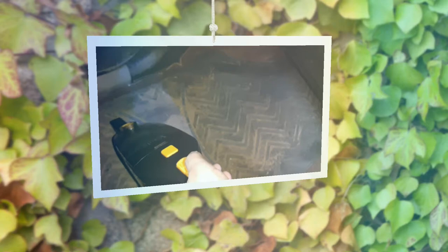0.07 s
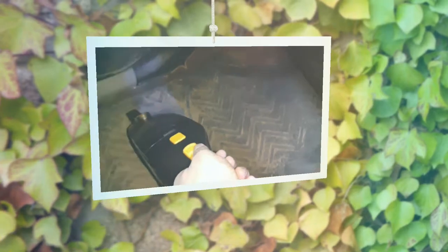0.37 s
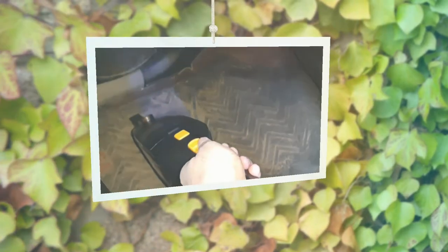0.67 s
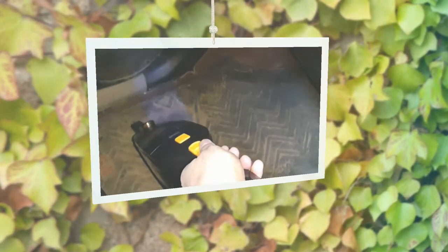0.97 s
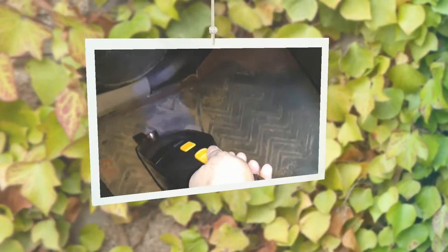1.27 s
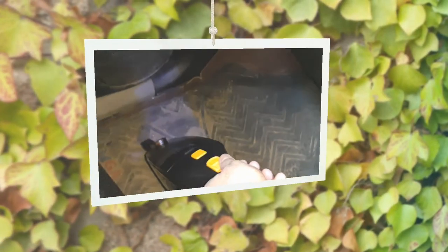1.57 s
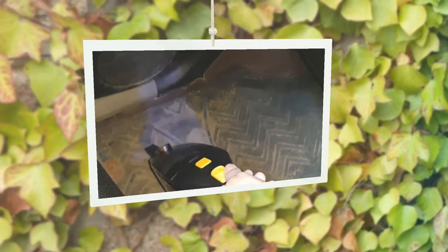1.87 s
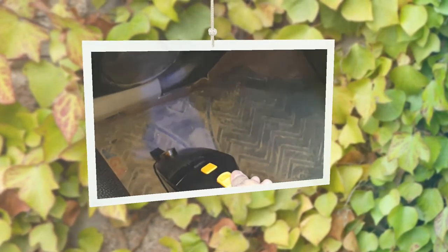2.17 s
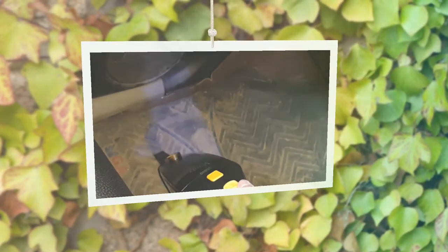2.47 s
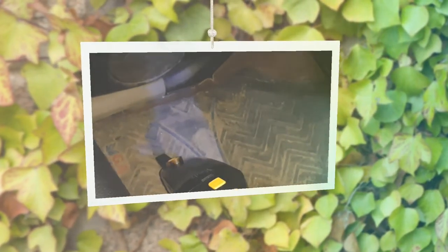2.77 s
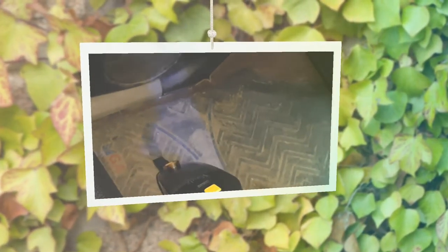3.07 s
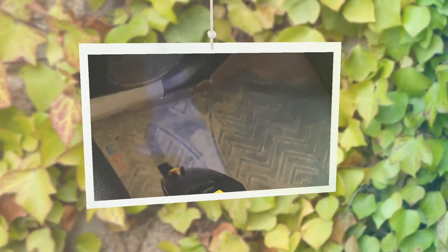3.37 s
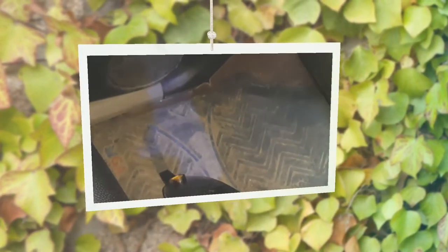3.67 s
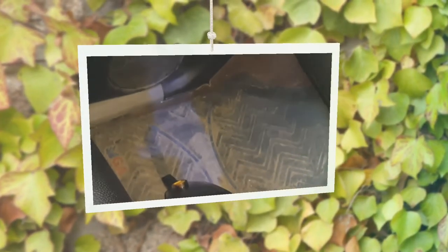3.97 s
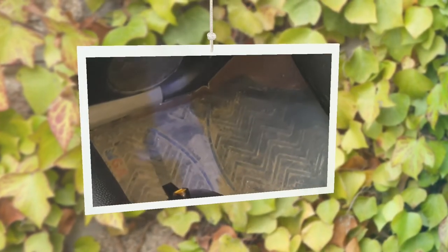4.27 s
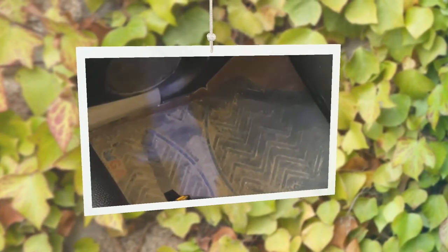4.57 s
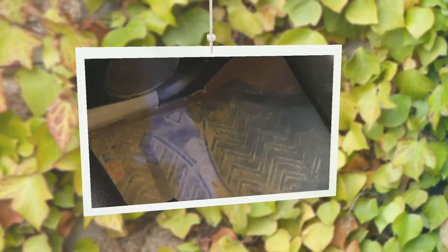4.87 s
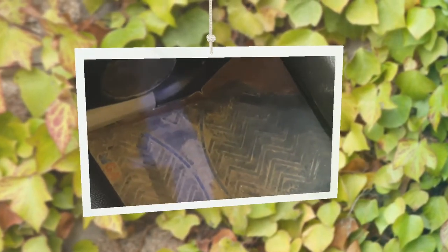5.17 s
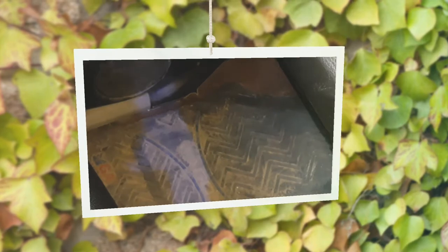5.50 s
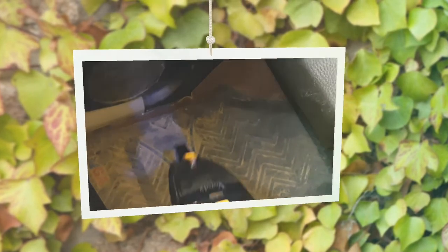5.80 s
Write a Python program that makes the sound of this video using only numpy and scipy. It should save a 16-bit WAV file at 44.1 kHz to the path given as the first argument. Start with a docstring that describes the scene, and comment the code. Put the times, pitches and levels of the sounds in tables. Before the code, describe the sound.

Heard close up in stereo, in the tight space of a car footwell, a handheld vacuum quickly comes up to speed. A wavering high whine and a lower hum sit within hollow, hissing suction, which swells briefly as the nozzle snags on the mat. Finally a switch clicks and the motor begins winding down, its tones sliding lower.

```python
"""A small handheld vacuum cleaner runs up in a car footwell, close to a stereo microphone.
Its shaft hums, the seven-blade fan whines, and air rushes through the nozzle and the plastic housing.
The hand draws it over the mat towards the microphone, the nozzle catching and gulping air on the way.
At about 5.5 s the switch snaps off and it starts to wind down: the air eases, and the falling tones
sweep through the resonances of the housing."""
import sys
import numpy as np
from scipy import signal
from scipy.fft import rfft, irfft, next_fast_len
from scipy.io import wavfile

SR = 44100
rng = np.random.default_rng(int(sys.argv[2]) if len(sys.argv) > 2 else 0)


def dump(signal):
    """Clip the signal to [-1, 1] and save it as 16-bit WAV at the path in sys.argv[1]."""
    limited = np.clip(np.atleast_2d(signal).T, -1, 1)
    pcm = np.round(limited * 32767).astype(np.int16)
    wavfile.write(sys.argv[1], SR, pcm)


N = 266275
TIME = np.arange(N) / SR
SIZE = next_fast_len(N, real=True)
HZ = np.arange(SIZE // 2 + 1) * SR / SIZE
START_S, OFF_S = 0.118, 5.47
RUN_HZ, BLADES = 418, 7  # nominal shaft speed; fan blades

# The hand draws the cleaner back. Each row: time in seconds, place from 0 (far) to 1 (at the microphone).
DRAWN = [(0.5, 0), (1.6, 0.21), (2.7, 0.79), (4.3, 0.91), (4.7, 1)]


def undb(db):
    """Decibels to gain."""
    return 10 ** (np.asarray(db) / 20)


def curve(points):
    """Join (seconds, value) points into a line through time."""
    return np.interp(TIME, *np.transpose(points))


def spectrum(points):
    """Join (Hz, value) points on a log-frequency axis."""
    hz, value = np.transpose(points)
    return np.interp(np.log(HZ + 1), np.log(hz), value)


def walk(rate):
    """Smooth random motion of unit spread, changing about rate times a second."""
    size, per_s = 4096, 500
    hz = np.arange(size // 2 + 1) * per_s / size
    motion = irfft(rfft(rng.standard_normal(size)) * np.exp(-(hz / rate) ** 2))
    return np.interp(TIME, np.arange(size) / per_s, motion / motion.std())


def swell(peak_s, half_width_s):
    """A smooth rise and fall, 1 at its top."""
    return np.exp(-((TIME - peak_s) / half_width_s) ** 2)


def sides(pan_db):
    """Left and right gains of constant total power."""
    gain = undb(np.array([pan_db, -pan_db]) / 2)
    return gain / np.sqrt(np.mean(gain ** 2, axis=0))


def shaft_speed(short_hz=64.2, spin_up_s=0.385):
    """Turns per second: the motor runs up, works, then coasts."""
    # Working speed rises as the nozzle is choked. Each row: time in seconds, speed in Hz.
    working = [(2.05, 416.6), (2.26, 420.3), (2.91, 423.6), (3.79, 426.5), (4.4, 424.4), (4.85, 419.8),
               (5.36, 417.5)]
    return (curve(working) - short_hz * np.exp((START_S - TIME) / spin_up_s)) * coast()


def motor(speed):
    """Unbalance hums at the shaft rate, the blades whistle at seven times it, among other shaft orders."""
    # Each entry: shaft order, level in dB; first the weak orders under power, then the coasting rotor.
    weak_db = {2: -52, 6: -55, 8: -54, 9: -55, 11: -50, 15: -56, 19: -52, 21: -46, 22: -51, 26: -54, 28:
               -49.5}
    unpowered_db = {1: -45.5, 2: -46.5, 3: -49, 4: -49.5, 5: -51.5, 6: -51, 7: -52, 8: -55, 14: -55}
    # Housing resonances. Each row: order that drives it, centre in Hz, width in Hz, gain in dB.
    housing = [(1, 401, 48.5, 10.5), (1, 303, 24, 5), (2, 765, 70, 6), (4, 1560, 130, 12),
               (5, 1855, 36, 20), (5, 1730, 65, 15), (6, 1850, 150, 9), (7, 2528, 56, 23.5),
               (7, 2352, 38, 23.5), (14, 4930, 130, 10), (14, 4700, 110, 12), (14, 4260, 170, 11),
               (28, 11100, 550, 5)]
    dip = swell(5.42, 0.009)  # pitch and level dip just before switch-off
    wobble = 0.00045 * walk(38) + 0.00062 * walk(4.7)
    turns = np.cumsum(speed * (1 + wobble - 0.04 * dip)) / SR
    coasting = np.clip((TIME - OFF_S) / 0.13, 0, 1)
    strong, pans = strong_orders(speed)
    out = 0
    for order, run_db in {**weak_db, **strong}.items():
        modes = [row[1:] for row in housing if round(row[0]) == order]
        ring_db = housing_gain(modes, order * speed)
        if order in strong:
            scatter = 0.022 * order
        else:
            run_db, scatter = run_db + ring_db, 0.6
        # a falling tone flickers as it crosses standing waves, the faster the higher its order
        ripple_db = 0.26 * order * walk(2.66 * order)
        coast_db = unpowered_db.get(order, weak_db.get(order, 0) - 22) + ring_db + ripple_db
        level_db = run_db + (coast_db - run_db) * coasting
        pan_db = pans.get(order, np.zeros(N)) * (1 - coasting)
        out = out + shaft_tone(order, turns, level_db, pan_db, scatter)
    return out * undb(-5 * dip)


def strong_orders(speed, hum_db_per_octave=35):
    """Level and lean in dB of the strong orders under power, shifting as the cleaner moves."""
    # The loudest whine, the thinner tone just above it, the blade whistle and its octave.
    # Each row: time in seconds, level in dB.
    whine = [(0.25, -36.5), (0.39, -33), (0.6, -36.5), (0.85, -36.5), (1.38, -38), (1.73, -35.5),
             (1.95, -37.5), (2.35, -31.5), (2.97, -29), (3.66, -28.5), (4.2, -34), (4.48, -36), (4.75, -31),
             (5.14, -31), (5.27, -32.5), (5.4, -31)]
    thin_tone = [(0.22, -42), (0.34, -35.5), (0.42, -38), (0.54, -55), (0.8, -46), (1.22, -37.5),
                 (1.45, -47), (3.0, -48), (3.85, -65), (4.4, -52), (4.95, -45), (5.4, -47)]
    whistle = [(0.2, -34), (0.3, -45), (0.38, -39), (0.51, -42), (0.63, -34), (1.2, -41), (1.6, -32),
               (1.9, -38), (2.3, -35.5), (2.9, -44), (3.25, -41), (3.7, -42.5), (4.0, -37.5), (4.8, -41),
               (5.3, -38.5)]
    whistle_octave = [(0.33, -43), (0.9, -49), (1.1, -42.5), (1.3, -42.5), (1.48, -51), (1.7, -45),
                      (2.15, -44), (2.5, -41), (2.78, -41), (3.08, -56), (3.4, -46), (3.7, -50), (3.9, -56),
                      (4.25, -47), (4.5, -48), (4.68, -40), (4.95, -47), (5.35, -46)]
    # Standing waves pull the whine to one side. Each row: time in seconds, left minus right in dB.
    whine_lean = [(0.4, 0.0), (0.69, -1.0), (0.75, -13), (1.07, 3.5), (2.15, -7.5), (2.31, -22), (2.82, -5),
                  (4.49, 2), (5.4, -1)]
    # The hum. Each row: order, level far and near in dB, left minus right far and near in dB.
    hum = [(1, -31, -33.5, 5.5, -1), (3, -49, -34.5, 3.5, -6)]
    drawn, lean = curve(DRAWN), curve(whine_lean)
    levels = {4: curve(whine), BLADES: curve(whistle),
              5: curve(thin_tone), 2 * BLADES: curve(whistle_octave)}
    pans = {4: lean, BLADES: 0.98 * lean}
    for order, far_db, near_db, far_pan, near_pan in hum:
        levels[round(order)] = far_db + (near_db - far_db) * drawn
        pans[round(order)] = far_pan + (near_pan - far_pan) * drawn
    levels[1] += hum_db_per_octave * np.log2(speed / RUN_HZ)  # unbalance hum grows with speed
    return levels, pans


def housing_gain(modes, tone_hz):
    """Gain in dB of a tone passing through resonances; between two neighbours they cancel."""
    response = sum(undb(db) / (1 + 1j * (tone_hz ** 2 - hz ** 2) / (width * tone_hz))
                   for hz, width, db in modes)
    return 10 * np.log10(1 + np.abs(response) ** 2)


def shaft_tone(order, turns, level_db, pan_db, scatter, flutter_db=0.77):
    """One shaft order: the direct tone plus reflections that shift, for each side, as the hand moves."""
    reflected = np.array([walk(4.1) + 1j * walk(26) + 0.94 * (walk(39) + 1j * walk(40))
                          for _ in range(2)])
    paths = (1 + scatter * reflected) / np.sqrt(1 + 2 * scatter ** 2)
    phase_gap = 0.13 * order * walk(1)  # shorter waves differ more between the sides
    if order == BLADES:  # the whistle turns wide for a moment, its sides out of phase
        phase_gap += 2.7 * swell(1.395, 0.26)
    phase = 2 * np.pi * (order * turns + rng.random()) + np.array([phase_gap, -phase_gap]) / 2
    wave = paths.real * np.cos(phase) - paths.imag * np.sin(phase)
    return np.sqrt(2) * wave * sides(pan_db) * undb(level_db + flutter_db * walk(51))


def suction(db_per_octave=16.5):
    """Hiss at the vents and a hollow rush in throat, nozzle and lip, dying away with the coasting fan."""
    # Colour of the hiss. Each row: frequency in Hz, spectral density in dB.
    hiss_colour = [(1000, -20), (2000, -9), (3300, -6), (4050, -3.5), (4700, -4.5), (6000, -3), (7400, -3),
                   (8300, -0.9), (9300, 0.5), (11000, -1), (11700, -6.5), (12800, -8.5), (14000, -12),
                   (15200, -55)]
    # Air resonances. Each row: centre in Hz, width in Hz, level far and near in dB.
    throat = [(2095, 180, -7, -3), (2323, 150, 2.5, 0.5), (2485, 220, 0.5, 0.5), (2800, 210, -3.5, -1.5)]
    nozzle = [(3263, 195, -1, 1), (3390, 230, -4, -1), (3608, 270, -1, -1.5), (3870, 230, -11, -1.5)]
    lip = [(4330, 460, -1.5, -2), (4636, 570, -2.5, -0.5), (4970, 320, -0.5, -1.5), (5770, 480, -1.5, -4.5)]
    # Airflow follows the gap between nozzle and mat. Each row: time in seconds, relative level in dB.
    hiss_level = [(0.34, -35), (1.2, -33), (1.6, -34), (2.05, -33), (2.15, -35), (2.6, -34.5), (3.2, -36),
                  (3.64, -35.5), (3.7, -36), (4.3, -33.5), (4.65, -33), (4.92, -31.5), (5.06, -33.7),
                  (5.48, -32.5)]
    throat_level = [(0.4, -42.5), (1.2, -41), (2.05, -40), (2.2, -43), (3.3, -44), (4.2, -42.3),
                    (4.9, -40.5), (5.25, -38.5), (5.48, -37.5)]
    nozzle_level = [(0.34, -40.5), (1.0, -39), (1.7, -37.5), (2.01, -32.5), (2.15, -39.5), (2.7, -41.3),
                    (3.15, -38), (3.64, -41), (3.7, -40), (4.7, -42), (4.92, -39.5), (5.06, -36),
                    (5.48, -39.5)]
    lip_level = [(0.34, -38), (1.4, -38), (1.9, -35.5), (2.05, -37.5), (2.15, -42), (3.15, -39.5),
                 (3.64, -42), (3.7, -45), (4.3, -39.5), (4.62, -36), (4.78, -37.5), (4.92, -35.5),
                 (5.06, -39), (5.48, -36)]
    hiss = turbulence(undb(spectrum(hiss_colour)) ** 2, band_hz=(6500, 14000))
    air = hiss * undb(curve(hiss_level) + 3) + gulps()
    for modes, level, boost_db in (throat, throat_level, 3), (nozzle, nozzle_level, 2), (lip, lip_level, 2):
        air += rush(modes) * undb(curve(level) + boost_db)
    eddies_db = 0.5 * walk(20)
    return air * undb(eddies_db + db_per_octave * np.log2(coast()))


def exhaust(speed, db_per_octave=12):
    """The low rush of the exhaust rings the dust cup and grows with fan speed."""
    # Colour of the exhaust. Each row: frequency in Hz, spectral density in dB.
    colour = [(20, -45), (50, -17), (68, 1.5), (95, -4), (180, -5), (250, 2), (480, -7.5), (620, -7),
              (1200, 2), (1520, -2.5), (1900, -3.5), (3000, -6.5)]
    # Dust cup and footwell resonances. Each row: centre in Hz, width in Hz, level far and near in dB.
    cup = [(558, 127, -10.5, -0.5), (725, 83, -2.5, 2.5), (835, 180, -0.5, -1.5), (938, 163, 0, 2),
           (1118, 126, 0.5, -3), (1395, 140, -10, -1)]
    outflow = turbulence(undb(spectrum(colour)) ** 2, band_hz=(50, 2000))
    air = outflow * undb(-46) + rush(cup) * undb(-40.5)
    return air * undb(walk(7.8) + db_per_octave * np.log2(speed / RUN_HZ))


def turbulence(power, band_hz=(0, SR / 2)):
    """Stereo noise of a given power spectrum, at unit level within the band."""
    # The sides are most alike in the bass. Each row: frequency in Hz, correlation of left and right.
    likeness = [(50, 0.93), (600, 0.91), (1000, 0.17), (1500, 0.33), (2500, 0.3), (5000, -0.075),
                (12000, 0.065)]
    # The top treble leans left. Each row: frequency in Hz, left minus right in dB.
    lean = [(200, 1), (750, -0.5), (1500, -2.5), (3400, 0), (9000, -0.9), (10500, 1.5), (12000, 7),
            (15000, 2)]
    power = power / np.mean(power * (HZ > band_hz[0]) * (HZ < band_hz[1]))
    alike = spectrum(likeness)
    shares = np.array([1 + alike, 1 - alike]) / 2
    mid, side = rfft(rng.standard_normal((2, SIZE))) * np.sqrt(power * shares)
    return irfft(np.array([mid + side, mid - side]) * sides(spectrum(lean)), SIZE)[:, :N]


def hollow(centre_hz, width_hz):
    """Noise in one steep-sided resonance, at unit level."""
    detuning = (HZ ** 2 - centre_hz ** 2) / (width_hz * HZ + 1)
    return turbulence(1 / (1 + detuning ** 2) ** 2)


def rush(modes, swell_db=0.4, flicker_db=1.2):
    """Air resonances trade strength as the cleaner nears the microphone, each wavering on its own."""
    drawn = curve(DRAWN)
    out, power = 0, 0
    for hz, width, far_db, near_db in modes:
        gain = np.sqrt(width) * undb(far_db + (near_db - far_db) * drawn)
        out = out + hollow(hz, width) * gain * undb(swell_db * walk(6) + flicker_db * walk(21))
        power = power + gain ** 2
    return out / np.sqrt(power)


def footwell(sound):
    """Short echoes off mat and walls comb the noise, differently on each side, and make it hollow."""
    # Each row: delay in milliseconds, gain, drift in milliseconds as the hand moves.
    echoes = [(1.3, 0.15, 0.22), (3.1, 0.32, 0.263), (6.4, 0.56, 0.299)]
    out = sound.copy()
    for delay_ms, gain, drift_ms in echoes:
        for side in range(2):
            lag_s = (delay_ms + drift_ms * walk(0.7)) / 1000
            out[side] += gain * np.interp(TIME - lag_s, TIME, sound[side])
    return out * sound.std() / out.std()


def gulps():
    """Brief hollow swells of air where the nozzle catches on the mat."""
    # Each row: peak time in seconds, half-width in seconds, level in dB, centre in Hz, width in Hz.
    catches = [(1.905, 0.04, -37, 4470, 1200), (3.156, 0.26, -42, 4670, 110),
               (3.624, 0.032, -37, 5600, 1200), (4.917, 0.035, -32.5, 4670, 750)]
    return sum(hollow(hz, width) * undb(db) * swell(peak_s, half_width_s)
               for peak_s, half_width_s, db, hz, width in catches)


def handling():
    """A faint rumble of handling, swelling once as the arm pulls back."""
    return hollow(centre_hz=34, width_hz=9.2) * undb(-79 + 8.5 * swell(4.2, 0.7))


def thump_and_switch():
    """A faint low thump as the tones briefly dip, then the switch slides and snaps."""
    # Each row: start in seconds, level in dB, centre in Hz, width in Hz, decay in seconds.
    bursts = [(5.419, -34, 270, 240, 0.0085), (5.479, -30, 2100, 1400, 0.006),
              (5.504, -24, 3200, 2400, 0.008)]
    out = 0
    for start_s, db, hz, width, decay_s in bursts:
        envelope = (TIME > start_s) * np.exp(-np.abs(TIME - start_s) / decay_s)
        out = out + hollow(hz, width) * undb(db) * envelope
    return out


def coast(decay_s=1.565):
    """Share of its speed that the rotor keeps after switch-off."""
    return np.exp(-np.maximum(TIME - OFF_S, 0) / decay_s)


def scene():
    """The cleaner in the footwell, its motor and air sharing one shaft speed."""
    # The sound fades in. Each row: time in seconds, gain in dB.
    fade_in = [(0.118, -44.5), (0.17, -31), (0.215, -17.5), (0.285, -10), (0.325, -1.5)]
    speed = shaft_speed()
    fade = undb(curve(fade_in)) * (TIME > START_S)
    return fade * (motor(speed) + footwell(suction()) + exhaust(speed) + handling() + thump_and_switch())


def record(dry, top_hz=15250):
    """The microphone chain cuts the top treble steeply."""
    return signal.sosfilt(signal.ellip(10, 0.2, 80, top_hz, fs=SR, output="sos"), dry)


dry = scene()
out = record(dry)
dump(out)
```